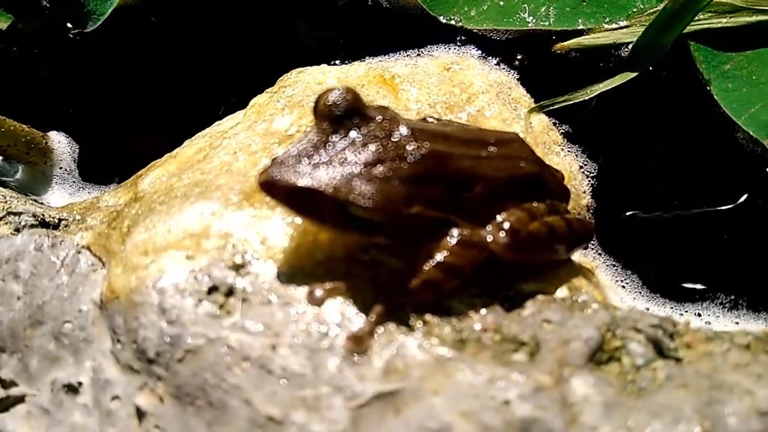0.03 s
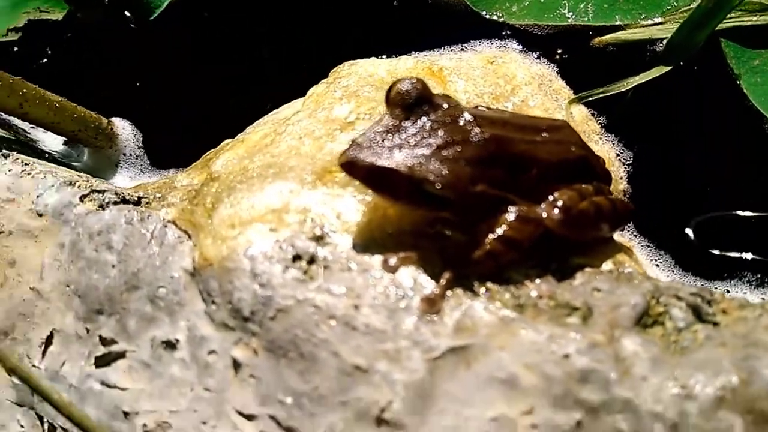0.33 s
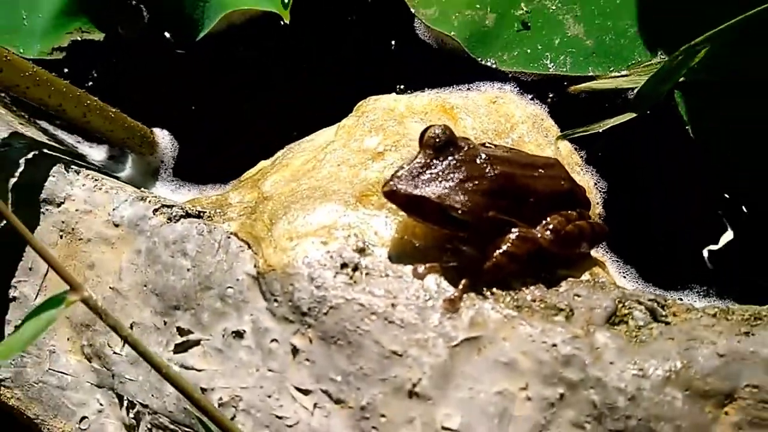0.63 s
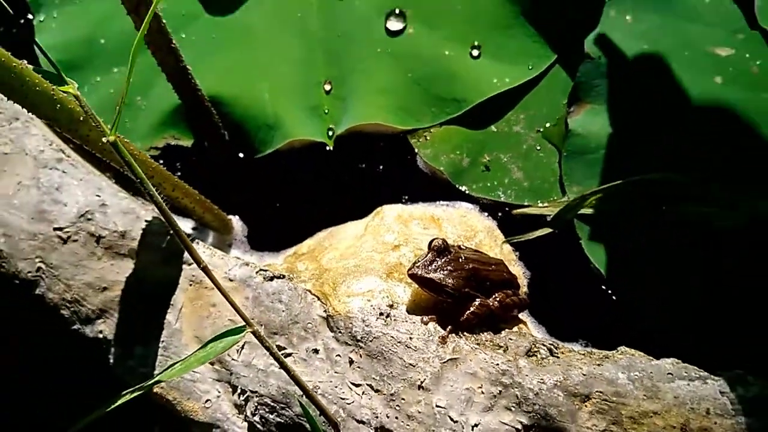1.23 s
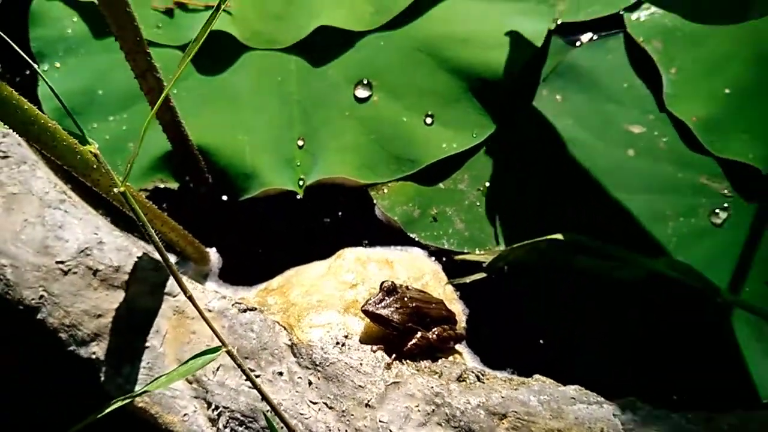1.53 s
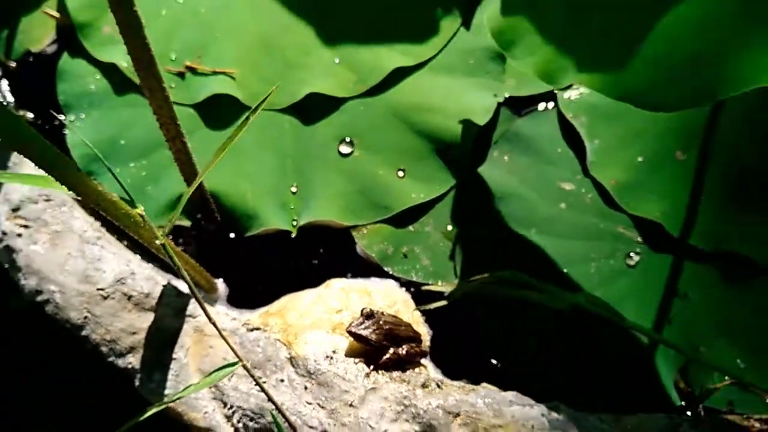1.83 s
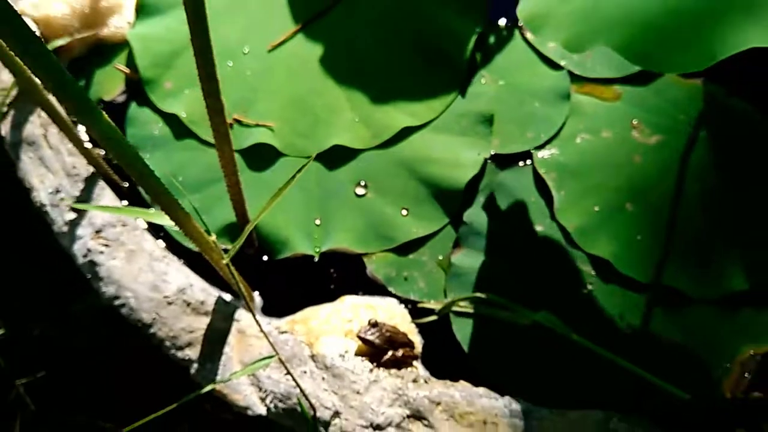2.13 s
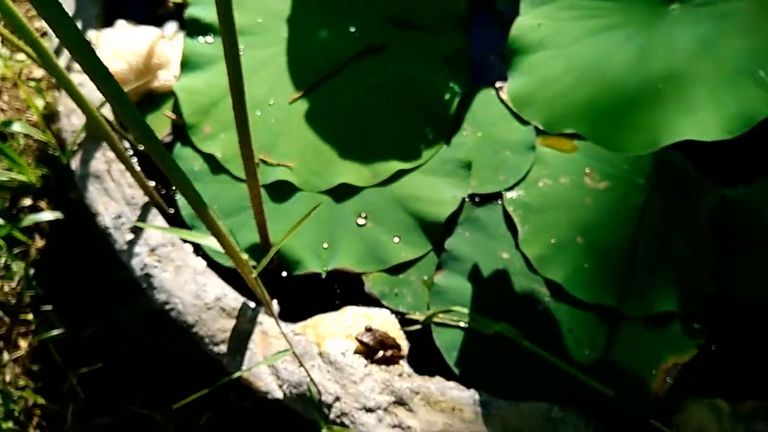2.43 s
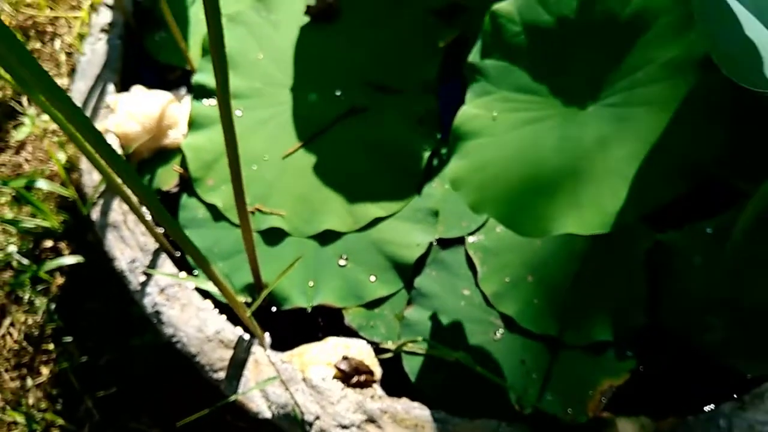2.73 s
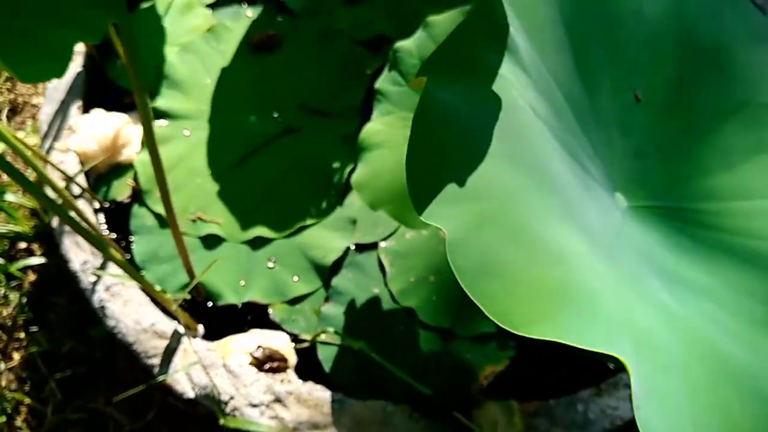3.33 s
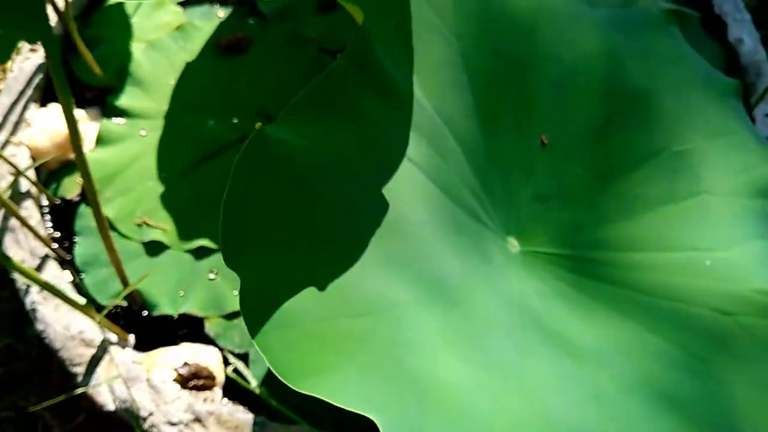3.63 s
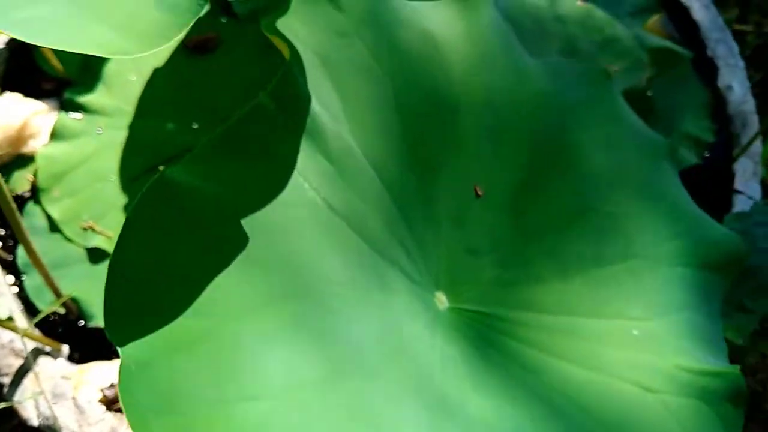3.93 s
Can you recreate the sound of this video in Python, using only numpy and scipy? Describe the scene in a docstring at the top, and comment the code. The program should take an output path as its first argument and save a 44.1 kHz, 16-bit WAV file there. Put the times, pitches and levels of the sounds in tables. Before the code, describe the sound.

A distant engine throbs over quiet pond ambience, with insects, breeze thumps and leaf clicks.

```python
"""A quiet, sunny garden lotus pond. From the start a slow engine or pump throbs far off, its firings
ringing the exhaust, and insects buzz and trill in phrases. Soon a breeze buffets the hand-held
microphone with soft thumps. About a second and a half in come a small tick, brief high hisses and a
thin falling chirp. Near the end the breeze swells, a leaf brushes the microphone's left port with a
few sharp clicks, and the high hiss returns."""
import sys
import numpy as np
from scipy import signal
from scipy.fft import rfft, irfft
from scipy.io import wavfile

SR = 44100
rng = np.random.default_rng(int(sys.argv[2]) if len(sys.argv) > 2 else 0)


def bounce(signal):
    """Save signal as a 16-bit WAV file at the path given by the first command-line argument."""
    frames = np.transpose(np.atleast_2d(signal))
    limited = np.clip(frames, -1, 1)
    pcm = np.round(limited * 32767).astype(np.int16)
    wavfile.write(sys.argv[1], SR, pcm)


N = 176400
T = np.arange(N) / SR
RUB_ATTACK_S, RUB_RELEASE_S = 0.0033, 0.025


def from_db(db):
    """Decibels to gain."""
    return 10 ** (np.asarray(db) / 20)


def rms_one(x):
    """Scale to unit power."""
    return x / np.sqrt(np.mean(x ** 2) + 1e-20)


def pan(db):
    """Left and right gains: positive leans left, and the nearer side keeps its full level."""
    return from_db([[min(db, 0)], [min(-db, 0)]])


def butter(x, order, hz, kind="low"):
    """Butterworth filter: low-pass, high-pass or band-pass."""
    return signal.sosfilt(signal.butter(order, hz, kind, fs=SR, output="sos"), x)


def noise(colour):
    """Wide stereo noise at unit power, shaped by (freq_hz, relative_db) points."""
    hz, db = np.transpose(colour)
    bins_hz = np.arange(N // 2 + 1) * SR / N
    gain = from_db(np.interp(np.log(bins_hz + 1), np.log(hz), db))
    return rms_one(irfft(rfft(rng.standard_normal((2, N))) * gain, N))


def drift(hz):
    """Random wobble at unit power, rolled off above hz."""
    return rms_one(butter(rng.standard_normal(N), 2, hz))


def narrow_noise(hz, width_hz):
    """A wavering tone: a narrow band of noise at unit power."""
    phase = 2 * np.pi * hz * T
    return drift(width_hz / 2) * np.cos(phase) + drift(width_hz / 2) * np.sin(phase)


def ring(start, hz, t60, wave=np.sin):
    """A struck resonance that falls 60 dB in t60 seconds."""
    age = np.maximum(T - start, 0)
    return (T >= start) * wave(2 * np.pi * hz * age) * from_db(-np.minimum(60 * age / t60, 200))


def envelope(start, length, attack_s, release_s):
    """Rise, hold, die away."""
    return np.clip((T - start) / attack_s, 0, 1) * np.exp(-np.maximum(T - start - length, 0) / release_s)


def engine():
    """Each firing is a push and a ragged puff of gas that ring the exhaust, uneven in time and force."""
    # exhaust resonances: pitch_hz, level_db, t60_s
    exhaust = [(77.6, -12, 0.081), (116.5, -10.5, 0.097), (143.8, -7.5, 0.17), (221.3, -16, 0.073),
               (264, -19, 0.083)]
    firing_hz, first_firing_s, jitter_s, spread_db = 23.8, 0.018, 0.00034, 4.1
    puff_s, puff_noise_hz, roughness = 0.024, 400, 0.77
    beats = np.arange(first_firing_s, T[-1], 1 / firing_hz)
    onsets = ((beats + jitter_s * rng.standard_normal(len(beats))) * SR).astype(int)
    fade = np.exp(-1 / (puff_s * SR))
    throb = 0
    for hz, db, t60 in exhaust:
        pushes = np.zeros(N)
        pushes[onsets] = from_db(db + spread_db * rng.standard_normal(len(onsets)))
        gas = np.array([drift(puff_noise_hz), drift(puff_noise_hz)])
        puffs = signal.lfilter([1 - fade], [1, -fade], pushes) * gas
        throb += signal.fftconvolve(pushes + roughness * puffs, [ring(0, hz, t60, np.cos)])[:, :N]
    muffled = butter(throb, 4, [57.6, 279], "band")  # the muffler passes only the low throb
    return from_db(-44) * pan(0.5) * muffled


def insects():
    """A fluttering buzz in phrases, with a thin, pulsing trill just below it, both to the left."""
    # buzz phrases: start_s, length_s, level_db
    buzzes = [(0.26, 0.44, -68), (0.865, .025, -65), (1.118, 0.62, -63.5), (1.821, 0.01, -57.5),
              (2.233, 0.46, -66.5), (2.4, 0.066, -60.5), (2.983, 0.81, -63.5)]
    # buzz colour: freq_hz, relative_db
    colour = [(3800, -14.5), (4500, -15), (4950, -1), (5300, 1.5), (5800, 7), (6050, 3.5), (6400, -64),
              (8000, -21)]
    # trill phrases: start_s, length_s, level_db
    trills = [(0.296, 0.4, -69), (1.375, 0.48, -69.5), (2.4, 0.19, -69), (3.084, 0.117, -49),
              (3.211, 0.57, -63), (3.464, 0.023, -43), (3.546, 0.027, -49)]
    trill_hz, pulses_per_s, flutter_db = 4670, 19, 2.5
    phrases = sum(from_db(db) * envelope(start, length, attack_s=0.038, release_s=0.053)
                  for start, length, db in buzzes)
    buzz = phrases * from_db(flutter_db * drift(hz=51)) * noise(colour)
    pulses = 0
    for start, length, db in trills:
        tremolo = np.abs(np.sin(np.pi * pulses_per_s * (T - start)))
        pulses += from_db(db) * envelope(start, length, attack_s=0.006, release_s=0.0072) * tremolo
    trill = pulses * narrow_noise(trill_hz, width_hz=175)
    return pan(20) * buzz + pan(20.5) * trill


def buffeting():
    """Breeze on the microphone's ports: dull thumps over a rough, fluttering rumble."""
    # thumps: start_s, pitch_hz, level_db, t60_s, pan_db
    hits = [(0.575, 79, -28.5, 0.044, -7), (.688, 76, -19.5, 0.14, 37), (.775, 120, -26.5, 0.027, 8),
            (0.939, 89, -24.5, 0.027, 14), (1.02, 292, -41.5, 0.059, 1.5), (1.148, 80, -24.5, 0.036, -36),
            (1.462, 75.6, -31, 0.083, -35), (1.524, 71.6, -33, 0.091, -33), (2.157, 277, -30, 0.023, 26),
            (2.531, 68, -27.5, 0.068, 26), (2.989, 90, -29, 0.056, -16), (3.119, 145, -12, 0.038, -37),
            (3.201, 72, -18, 0.15, 21), (3.26, 124.6, -24, 0.15, 19), (3.299, 103, -17.5, 0.035, 29),
            (3.864, 76, -21.5, 0.073, 28), (3.97, 102, -18.5, 0.037, 33.5)]
    # rise and fall of the breeze: time_s, level_db
    breeze = [(0, -112), (.4, -59), (.62, -43), (.85, -53.5), (1.3, -69.5), (2.7, -66.5), (3.0, -46),
              (3.25, -35), (3.45, -43), (3.6, -53.5), (3.8, -62), (4, -43.5)]
    # rumble colour: freq_hz, relative_db
    colour = [(20, 1.5), (60, 5.5), (140, 3), (260, -11.5), (480, -33), (1200, -35), (4000, -76)]
    thump_band_hz, flutter_db = [40, 350], 5
    thumps = sum(from_db(db) * pan(pan_db) * ring(start, hz, t60) for start, hz, db, t60, pan_db in hits)
    gusts = from_db(np.interp(T, *np.transpose(breeze)))
    rumble = gusts * from_db(flutter_db * drift(hz=44)) * pan(5.5) * noise(colour)
    return butter(thumps, 2, thump_band_hz, "band") + rumble


def clicks():
    """Each contact is a quick double snap with a bright edge and a hollow ring with one overtone."""
    # small contacts and leaf clicks: start_s, body_hz, body_db, body_t60_s, snap_hz, snap_db,
    # crack_db, second_snap_relative_db, low_cut_hz, pan_db
    contacts = [(1.3378, 1130, -39.5, 0.012, 573, -29.5, -70, -8, 350, -3.5),
                (2.846, 725, -32.5, 0.0046, 1620, -30.5, -65, -14, 300, -27),
                (3.0576, 221, -3, 0.0082, 830, -1, -46, -30, 105, 33),
                (3.077, 400, -34, 0.0018, 3840, 2, -8.5, -5.5, 140, 44),
                (3.1297, 900, -41, 0.003, 4540, -20, -18, -10, 400, 30),
                (3.153, 1300, -7.5, 0.0067, 2580, -39, -0.5, -37, 257, 28),
                (3.312, 1420, -46, 0.0094, 5600, -44, -26, -22, 600, 25),
                (3.4624, 520, -22.5, 0.024, 910, -29, -60, -14, 260, 39),
                (3.469, 875, -25.5, 0.0086, 2870, -2.5, -42, -28, 200, 36),
                (3.475, 410, -20.5, 0.011, 1490, -28, -40, -14, 150, 27),
                (3.5248, 563, -6, 0.0082, 1890, 1, -6, -12.5, 448, 28)]
    snap_cycles, second_snap_s, crack_hz, crack_t60_s = 1.47, 0.00035, 8200, 0.00063
    overtone_ratio, overtone_db = 1.6, -5
    out = 0
    for start, body_hz, body_db, t60, snap_hz, snap_db, crack_db, second_db, low_hz, pan_db in contacts:
        snap = from_db(snap_db) * ring(start, snap_hz, snap_cycles / snap_hz)
        snap += from_db(crack_db) * ring(start, crack_hz, crack_t60_s)
        double_snap = snap + from_db(second_db) * np.roll(snap, round(second_snap_s * SR))
        overtone = from_db(overtone_db) * ring(start, overtone_ratio * body_hz, t60 / 2)
        body = from_db(body_db) * (ring(start, body_hz, t60) + overtone)
        out += pan(pan_db) * butter(double_snap - body, 4, low_hz, "high")
    return out


def leaf_rub():
    """A leaf slides and scratches: grainy friction around the clicks, some strokes duller than others."""
    # leaf strokes: start_s, length_s, level_db, high_cut_hz, pan_db
    strokes = [(1.322, 0.0074, -53.5, 12000, 13), (3.054, 0.091, -43.5, 13800, 26),
               (3.147, 0.027, -38.5, 16400, 20), (3.458, 0.015, -36.5, 3880, 23),
               (3.512, 0.063, -41.5, 8500, 19)]
    # friction colour: freq_hz, relative_db
    colour = [(150, -10), (400, 2), (900, 6), (1500, 1.5), (2500, -3), (4000, -3), (5400, -1.5), (7500, -4),
              (10500, -5), (13000, -5), (16000, -5)]
    grain_db = 3
    friction = from_db(grain_db * drift(hz=530)) * noise(colour)
    out = 0
    for start, length, db, high_cut_hz, pan_db in strokes:
        pressure = envelope(start, length, RUB_ATTACK_S, RUB_RELEASE_S)
        out += from_db(db) * pan(pan_db) * pressure * butter(friction, 1, high_cut_hz)
    return out


def scuff():
    """One light, bright brush that starts at once and dies away."""
    # brush stroke: start_s, length_s, level_db, pan_db
    strokes = [(1.316, 0.0056, -46, -0.5)]
    bright = rms_one(butter(rng.standard_normal((2, N)), 1, hz=7000, kind="high"))
    return bright * sum(from_db(db) * pan(pan_db) * envelope(start, length, RUB_ATTACK_S, RUB_RELEASE_S)
                        for start, length, db, pan_db in strokes)


def sizzles():
    """Short, very high hisses, mostly on the right."""
    # hiss bursts: start_s, length_s, level_db, pan_db
    bursts = [(1.346, 0.15, -50.5, -8.5), (1.532, 0.18, -51, -8), (3.187, 0.17, -54.5, 16),
              (3.934, 0.016, -45.5, -19)]
    # sizzle colour: freq_hz, relative_db
    colour = [(3000, -22), (6500, -12), (8000, -5.5), (9100, -20), (9600, 10), (10500, 6), (11800, 1),
              (12600, -9), (15000, -8), (16000, -36)]
    gain = sum(from_db(db) * pan(pan_db) * envelope(start, length, attack_s=0.02, release_s=0.029)
               for start, length, db, pan_db in bursts)
    return gain * noise(colour)


def chirp():
    """A thin tone, made hoarse by noise, falls in pitch and fades."""
    # falling glide: start_s, length_s, start_hz, end_hz, level_db
    glides = [(1.52, 0.18, 8300, 7370, -55.5)]
    hoarseness_hz, attack_fraction = 270, 0.078
    out = 0
    for start, length, start_hz, end_hz, db in glides:
        progress = np.clip((T - start) / length, 0, 1)
        rise = np.minimum(progress / attack_fraction, 1)
        fall = (1 - progress) ** 2
        tone = np.sin(2 * np.pi * np.cumsum(end_hz + (start_hz - end_hz) * fall) / SR)
        rasp = np.array([drift(hoarseness_hz), drift(hoarseness_hz)])
        out += 2 * from_db(db) * rise * fall * tone * rasp
    return out


def outdoor_air():
    """A soft bed of noise: the low and middle bands each flicker on their own under a steady top."""
    # air colour: freq_hz, relative_db
    colour = [(25, -21), (60, 10.5), (150, -1.5), (300, -1.5), (500, -4.5), (900, -8.5), (1300, -10),
              (2000, -8), (3000, -14.5), (4000, -17.5), (6000, -15), (7500, -20), (10000, -23.5),
              (13000, -22), (16000, -49)]
    flicker_db = 2.5
    top, flickering = noise(colour), 0
    for crossover_hz in (400, 800, 1600, 3200):
        band = signal.sosfiltfilt(signal.butter(4, crossover_hz, fs=SR, output="sos"), top)
        top = top - band
        flickering += band * from_db(flicker_db * drift(hz=16.5))
    return from_db(-61.5) * pan(4) * (flickering + top)


def distant_swells():
    """Faint bands of noise that rise and sink far away."""
    # swells: start_s, length_s, centre_hz, width_hz, level_db, pan_db
    swells = [(-.1, 0.32, 866, 89, -66.5, 2), (0.193, 0.62, 814.6, 151, -62.5, -5.5),
              (0.287, 0.061, 812, 156, -54.5, -6.5), (1.117, 0.29, 1880, 635, -63.5, 4),
              (1.311, 0.088, 890, 955, -57.5, 0.5), (1.91, 0.26, 1318, 180, -68, 15),
              (2.1, 0.073, 8900, 800, -62.5, -16), (2.204, 1, 1444, 780, -63, 1.5),
              (3.27, 0.52, 1120, 825, -58, 4)]
    out = 0
    for start, length, hz, width_hz, db, pan_db in swells:
        band = np.array([narrow_noise(hz, width_hz), narrow_noise(hz, width_hz)])
        arch = np.sin(np.pi * np.clip((T - start) / length, 0, 1))
        out += from_db(db) * pan(pan_db) * arch * band
    return out


def microphone_hiss():
    """The microphone's own steady noise floor, mostly on the right."""
    # hiss colour: freq_hz, relative_db
    colour = [(3000, -2.5), (7000, -26), (8800, 1.5), (9800, 6), (11000, 4), (12500, -11.5), (16000, -25)]
    return from_db(-66) * pan(-16.5) * noise(colour)


def scene():
    """The garden, plus the breeze and the leaf right on the microphone."""
    garden = engine() + outdoor_air() + microphone_hiss() + distant_swells()
    garden += insects() + sizzles() + chirp()
    return garden + buffeting() + clicks() + leaf_rub() + scuff()


def record(dry):
    """Trim the deepest rumble and cut the very top steeply."""
    low_cut_hz, high_cut_hz = 63, 16200
    lean = butter(dry, 2, low_cut_hz, "high")
    return signal.sosfilt(signal.ellip(10, .1, 70, high_cut_hz, fs=SR, output="sos"), lean)


dry = scene()
out = record(dry)
bounce(out)
```